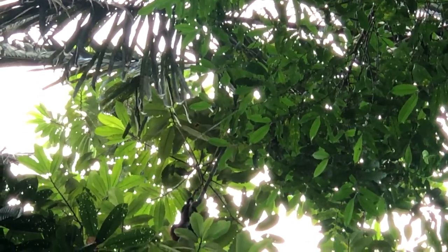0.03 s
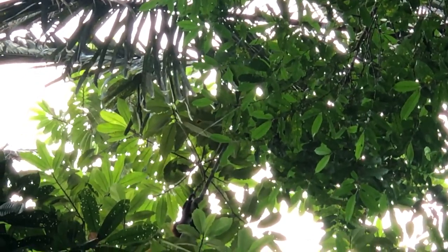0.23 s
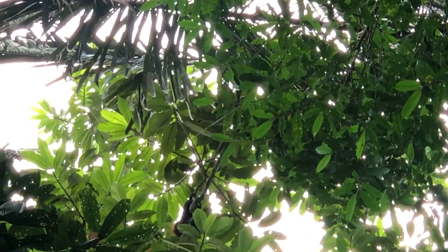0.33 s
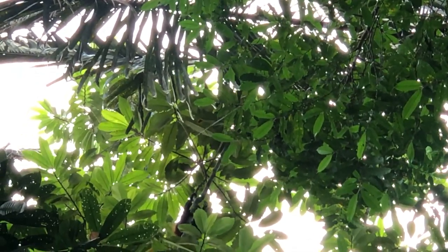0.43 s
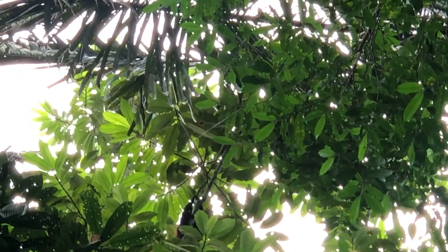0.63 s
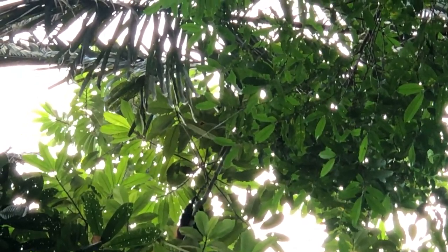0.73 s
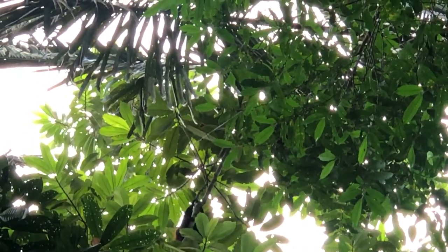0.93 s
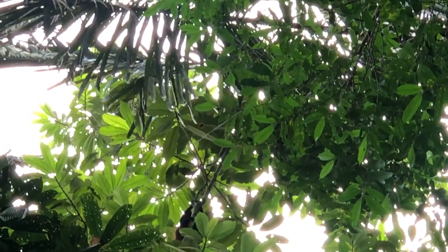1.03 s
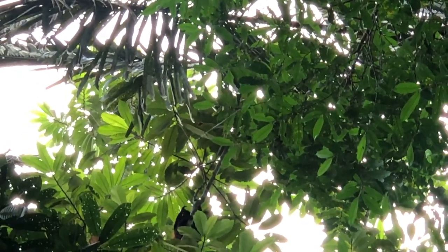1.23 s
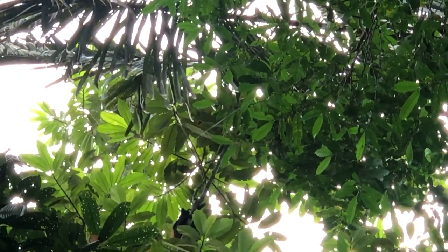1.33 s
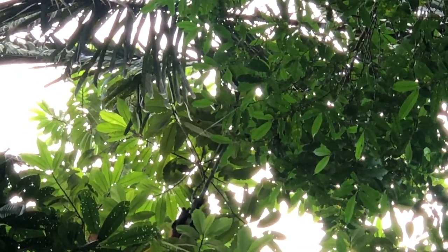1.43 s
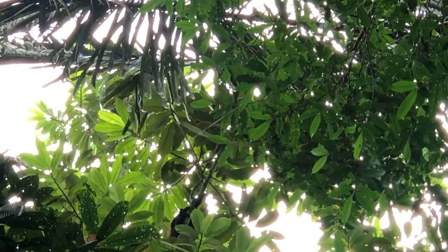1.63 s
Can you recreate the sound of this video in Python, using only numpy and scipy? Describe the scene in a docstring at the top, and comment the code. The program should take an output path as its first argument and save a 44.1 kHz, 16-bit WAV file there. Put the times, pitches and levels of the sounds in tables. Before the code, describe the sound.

A howler monkey hoots from high in a rainforest tree. One call dies away at the start, then three low, hoarse hoots come at about 0.2, 0.7 and 1.2 seconds, with another just beginning near 1.7 seconds. Each rises quickly to a breathy rasp and trails off in a growl, echoing among the trees. Underneath, the echo of earlier howling slowly fades and insects buzz faintly.

```python
"""A howler monkey calls high in a rainforest tree. First a hoot dies away; three hoarse hoots follow,
about two a second, and another is just starting at the end. In each, uneven throat pulses and rushing
air excite the throat resonances: the sound rises quickly, swells to a rasping crest and trails off in
a growl. After each call the trees return a scattered echo. Throughout, the howling of earlier hoots
fades slowly and insects buzz thinly over a quiet forest floor."""
import sys
import numpy as np
from scipy import signal
from scipy.fft import rfft, irfft
from scipy.io import wavfile
from scipy.ndimage import uniform_filter1d

SR = 44100
rng = np.random.default_rng(int(sys.argv[2]) if len(sys.argv) > 2 else 0)


def store_wav(level_fs):
    """Save 16-bit WAV to argv[1]."""
    pcm = np.round(np.clip(np.atleast_2d(level_fs), -1, 1) * 32767)
    wavfile.write(sys.argv[1], SR, pcm.T.astype(np.int16))


N = 74970
T = np.arange(N) / SR

# Hoots: start t/s, crest t/s, end t/s, level/dB, swell/dB, growl/dB, throat tuning ratio, mouth boost/dB,
# rasp/dB, rasp rise t/s, rasp lead on the crest t/s, lower whistle/dB, upper whistle/dB
HOOTS = [(-.3, -0.18, 0.018, -35.5, 6, 2.5, 1.052, -2, 0, .08, .02, -6, -1),
         (0.206, 0.322, 0.488, -35, 6.5, -0.5, 0.94, 0, 1.5, .025, .024, -3, -2),
         (0.67, 0.78, 0.93, -31, 0.5, -6, 1.005, 1, 1, 0.07, 0.018, 3, -7),
         (1.165, 1.285, 1.516, -33.5, 3, -5, 1.016, 2.5, 0.5, .06, 0.054, 1, -7.5),
         (1.684, 1.812, 2.5, -36.5, 4, 7, 1.04, 3.5, 13.5, .08, 0.026, -7, 23)]
# Middle of the upper resonances' glide, one per hoot: t/s
GLIDE_TIMES = [-.2, .365, .752, 1.232, 1.77]
# Low throat resonances: start f/Hz, crest f/Hz, relaxed f/Hz, bandwidth/Hz, level/dB, share of the rasp
LOW_FORMANTS = [(220, 285, 265, 40, -22.5, -0.57), (326, 310, 328, 39, -15, 0.11),
                (452, 418, 372, 67, -3.5, -0.14), (443, 423, 394, 28.4, -8, 0.33),
                (473, 590, 560, 66.6, -14.5, -0.09), (714, 721.5, 644, 93, -4, 0.14),
                (679, 775, 712.5, 15, -15, 0.97), (970, 803, 998, 68, -28, 0.45),
                (1200, 1130, 1080, 174, -30, 0.35)]
# Sharp upper resonances, the last two being the whistles:
# f/Hz before the glide, f/Hz after it, bandwidth/Hz, level/dB, share of the rasp, lag on the rasp t/s
HIGH_FORMANTS = [(1540, 1580, 30, -22.5, 0.44, 0.0033), (2590, 2350, 42, -30, 0.62, 0.036),
                 (3230, 3223, 100, -39, 0.88, 0.0033), (5720, 5920, 250, -38, 0.075, .002),
                 (4303, 4090, 86, -26.5, 0.77, 0.037), (5390, 5400, 103, -31.5, 3.6, 0.0012)]
# Spectral density of the rushing breath: f/Hz, relative level/dB
BREATH_SPECTRUM = [(50, -19), (130, 17.5), (400, 13), (1000, -15), (2000, 1), (4800, -24), (5800, 6.5),
                   (6900, -7), (7900, 5), (9300, -9), (12000, -12), (17000, -24)]
# Howling that hangs among the trees: f/Hz, bandwidth/Hz, initial level/dB
ECHO_BANDS = [(383.5, 32, -52.5), (750, 46, -59.5)]
# Insect buzz: f/Hz, bandwidth/Hz, level/dB
INSECT_BANDS = [(5200, 310, -78.5), (6350, 220, -71.5), (6570, 106, -77), (7490, 250, -79)]
# Spectral density of the forest floor's noise: f/Hz, relative level/dB
FLOOR_SPECTRUM = [(22, -24), (50, 5), (80, 6.5), (140, 5.5), (250, -4), (420, 11.5), (780, 7), (1100, -3.5),
                  (2000, -6.5), (4500, -9.5), (7000, -14.5), (10000, -20), (17000, -26)]

ATTACK_S, ATTACK_DB, HOLD_S, DROP_S = 0.033, 17, 0.0097, 0.011
GROWL_FADE_DB_PER_S, RELEASE_DB_PER_S = 68.5, 321
RASP_DEPTH_DB, RASP_GROWTH_DB_PER_S = 18.5, 13.5   # rasp: the treble comes out around the crest
SETTLE_S, GLIDE_S = 0.092, .016
STAGES, TUNING_SHARES = (0, 1, 2), (.6, 0.37, 1)   # the throat at the start, near the crest, relaxed


def monkey(air_db=2, flutter_db=1.5, chest_cut_hz=247):
    """Source and filter: pulses and air drive the throat resonances under the envelope of the hoots."""
    level, rasp, stage, glide, tuning, mouth_db, lower_db, upper_db = articulation()
    pulses, air = larynx()
    source = pulses + from_db(air_db) * air
    voice = low_formants(source, rasp, stage, tuning, mouth_db)
    voice += high_formants(source, rasp, glide, lower_db, upper_db)
    voice *= from_db(level + flutter_db * drift(rate_hz=26.7))
    high_pass = signal.butter(4, chest_cut_hz, "high", fs=SR, output="sos")
    return signal.sosfilt(high_pass, voice) + breath(air, level, rasp)


def articulation():
    """Amplitude and frequency modulation: each hoot sets the course of level, rasp and resonances."""
    controls = np.zeros((8, N))
    for hoot, glide_at in zip(HOOTS, GLIDE_TIMES):
        start, crest, end, db, swell_db, growl_db, tuning, mouth_db = hoot[:8]
        rasp_db, rise_s, lead_s, lower_db, upper_db = hoot[8:]
        onset, top, bright = start - .01, crest + HOLD_S, crest - lead_s
        release_db = RELEASE_DB_PER_S * np.maximum(T - end, 0)
        corners = [onset, start, start + ATTACK_S, top, top + DROP_S]
        level = db + np.interp(T, corners, [-40, -ATTACK_DB, 0, swell_db, growl_db])
        level -= GROWL_FADE_DB_PER_S * np.maximum(T - top - DROP_S, 0) + release_db
        rasp = np.interp(T, [bright - rise_s, bright], [-RASP_DEPTH_DB, 0])
        rasp += RASP_GROWTH_DB_PER_S * np.maximum(T - bright, 0)
        rasp = rasp_db + np.maximum(rasp - release_db, -RASP_DEPTH_DB)
        stage = np.interp(T, [start, bright, crest + SETTLE_S], STAGES)
        glide = .5 + .5 * np.tanh((T - glide_at) / GLIDE_S)
        ratio = tuning ** np.interp(stage, STAGES, TUNING_SHARES)
        curves = np.broadcast_arrays(level, rasp, stage, glide, ratio, mouth_db, lower_db, upper_db)
        controls = np.where(T > onset, curves, controls)
    return controls


def larynx(pulse_hz=84.94, jitter=.25, shimmer_db=1, puff_s=0.012, steady_flow=0.75):
    """Aperiodic phonation: pulses vary in period and strength, and each lets a puff of air through."""
    cycles = np.cumsum(pulse_hz * np.exp(jitter * drift(rate_hz=60))) / SR
    pulses = np.diff(np.floor(cycles), prepend=0) * from_db(shimmer_db * rng.standard_normal(N))
    opening = rms_one(signal.lfilter([1], [1, -np.exp(-1 / (puff_s * SR))], pulses))
    air = rms_one((opening + steady_flow) * rng.standard_normal(N))
    return low_pass(rms_one(pulses), hz=1230), air


def low_formants(source, rasp, stage, tuning, mouth_db, mouth_ramp_hz=(466, 756)):
    """Cavity resonance: the bands move with the throat, and an open mouth lifts the higher ones."""
    sound = 0
    for *path_hz, width_hz, db, share in LOW_FORMANTS:
        hz = np.interp(stage, STAGES, path_hz) * tuning
        gain = from_db(db + share * rasp + mouth_db * np.interp(hz, mouth_ramp_hz, [0, 1]))
        sound += gain * evened(resonate(source, hz, width_hz), size=1200)
    return sound


def high_formants(source, rasp, glide, lower_db, upper_db):
    """Sharp resonance: narrow bands ring, glide once a hoot and follow the rasp after a short lag."""
    sound = 0
    for formant, accent_db in zip(HIGH_FORMANTS, [0, 0, 0, 0, lower_db, upper_db]):
        from_hz, to_hz, width_hz, db, share, lag_s = formant
        hz = from_hz + (to_hz - from_hz) * glide
        late_rasp = np.interp(T - lag_s, T, rasp)
        sound += from_db(db + accent_db + share * late_rasp) * evened(resonate(source, hz, width_hz))
    return sound


def breath(air, level, rasp, gain_db=-24.5, rasp_share=0.39, leaves_db=-5):
    """Flow noise: rushing air gives a broadband hiss, which nearby foliage scatters."""
    hiss = from_db(level + gain_db + rasp_share * rasp) * coloured(air, BREATH_SPECTRUM)
    return hiss + from_db(leaves_db) * scatter(hiss, t60_s=0.19)


def forest(voice, gain_db=-7):
    """Reverberation: trunks and leaves return a long, duller tail."""
    return from_db(gain_db) * low_pass(scatter(voice, t60_s=0.84), hz=6500)


def lingering_echo(fade_db_per_s=10):
    """Exponential decay: the far echo of earlier hoots dies away in two narrow bands."""
    echo = sum(from_db(db) * evened(resonate(rng.standard_normal(N), hz, width_hz))
               for hz, width_hz, db in ECHO_BANDS)
    return echo * from_db(-fade_db_per_s * T)


def insects(throb_db=1):
    """Amplitude modulation: narrow bands of noise throb together irregularly, heard as a buzz."""
    throb = from_db(throb_db * drift(rate_hz=44.5))
    return throb * sum(from_db(db) * rms_one(resonate(rng.standard_normal(N), hz, width_hz))
                       for hz, width_hz, db in INSECT_BANDS)


def forest_floor(level_db=-58):
    """Stationary noise: a faint broadband background, strongest below 1 kHz."""
    return from_db(level_db) * coloured(rng.standard_normal(N), FLOOR_SPECTRUM)


def scatter(x, t60_s, build_s=0.01):
    """Multiple scattering: dense echoes build up, then decay exponentially."""
    tail = rng.standard_normal(N) * from_db(-60 * T / t60_s) * (1 - np.exp(-T / build_s))
    return signal.fftconvolve(x, tail / np.sqrt(np.sum(tail ** 2)))[:N]


def resonate(x, hz, width_hz):
    """Heterodyning: a shift to 0 Hz, a low-pass and a shift back make a resonance that can move."""
    carrier = np.exp(2j * np.pi * np.cumsum(hz + np.zeros(N)) / SR)
    return (low_pass(x / carrier, width_hz * np.pi / 4) * carrier).real


def coloured(x, spectrum):
    """Spectral shaping: a gain curve interpolated over log frequency, with the result at unit power."""
    hz, db = np.transpose(spectrum)
    bin_hz = np.maximum(np.arange(N // 2 + 1) * SR / N, 1)
    gain = from_db(np.interp(np.log(bin_hz), np.log(hz), db))
    return rms_one(irfft(rfft(x) * gain, N))


def drift(rate_hz):
    """Random fluctuation: low-passed noise of unit power."""
    return rms_one(low_pass(rng.standard_normal(N), rate_hz))


def low_pass(x, hz):
    """Exponential smoothing: two one-pole stages, settled beforehand on the mirrored signal."""
    pole = np.exp(-2 * np.pi * hz / SR)
    return signal.lfilter([(1 - pole) ** 2], [1, -2 * pole, pole * pole], np.r_[x[::-1], x])[N:]


def evened(x, size=1500):
    """Envelope division holds the short-term power at one."""
    return x / np.sqrt(uniform_filter1d(uniform_filter1d(x ** 2, size), size) + 1e-12)


def rms_one(x):
    """Normalisation to unit power."""
    return x / np.sqrt(np.mean(x ** 2) + 1e-20)


def from_db(db):
    """Amplitude ratio of a level in decibels."""
    return 10 ** (np.asarray(db) / 20)


def scene():
    """Superposition: the monkey, its echoes, the insects and the forest floor add in one channel."""
    voice = monkey()
    floor = forest_floor()
    return (voice + forest(voice) + lingering_echo() + insects() + floor)[None]


def record(dry, cutoff_hz=17200):
    """Band limiting: a steep low-pass removes the highest treble."""
    return signal.sosfilt(signal.ellip(12, .1, 80, cutoff_hz, fs=SR, output="sos"), dry)


dry = scene()
out = record(dry)
store_wav(out)
```